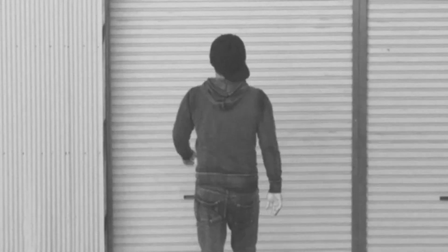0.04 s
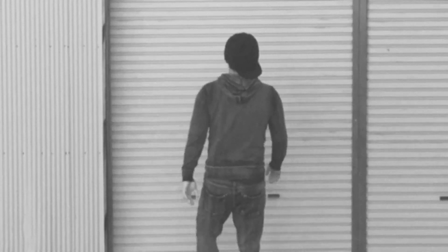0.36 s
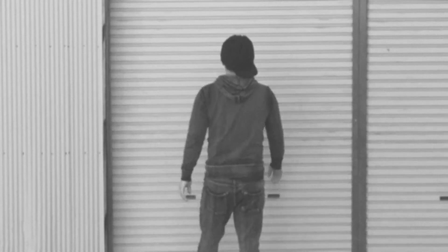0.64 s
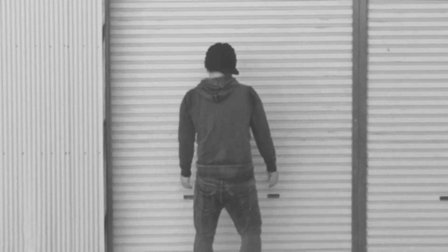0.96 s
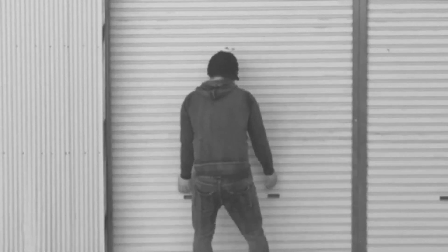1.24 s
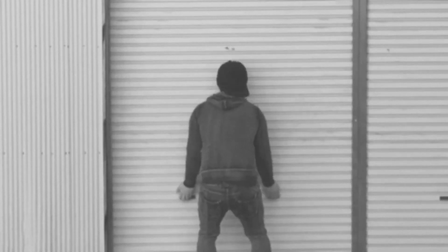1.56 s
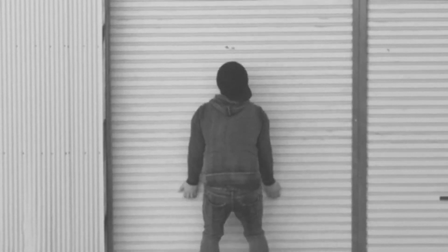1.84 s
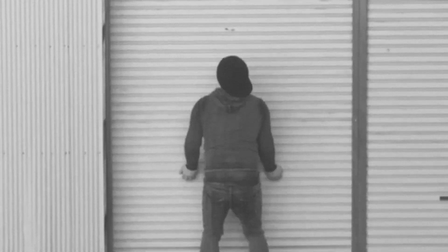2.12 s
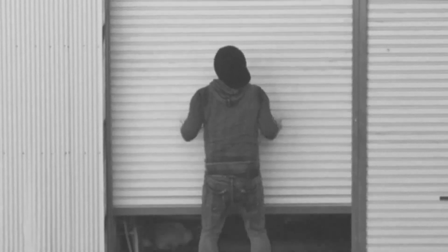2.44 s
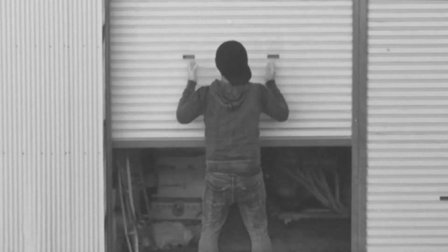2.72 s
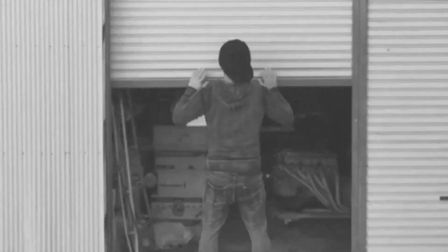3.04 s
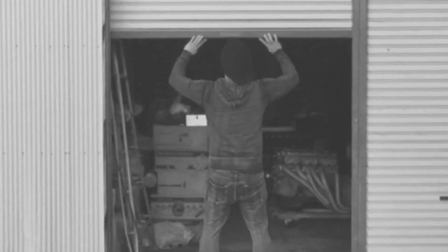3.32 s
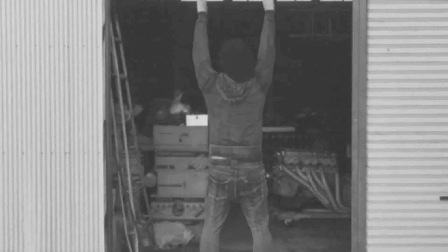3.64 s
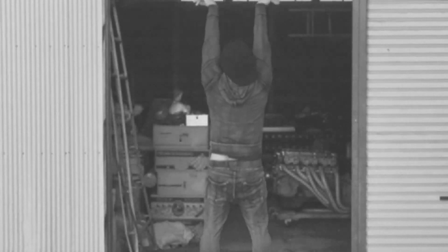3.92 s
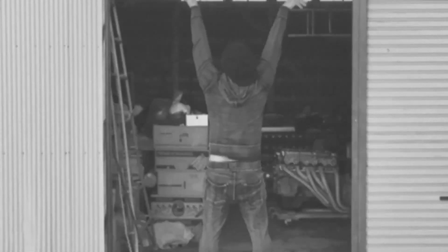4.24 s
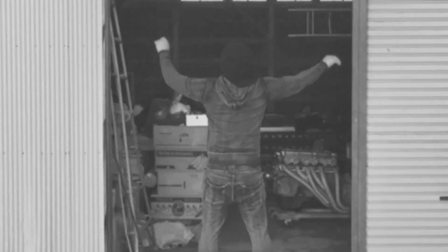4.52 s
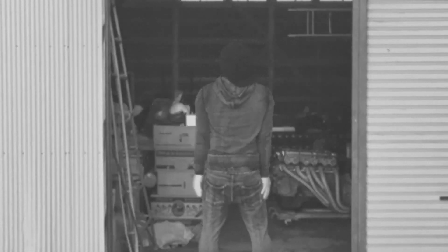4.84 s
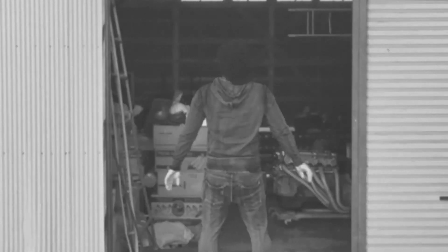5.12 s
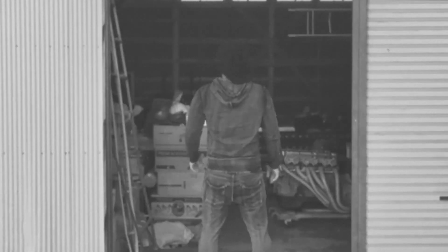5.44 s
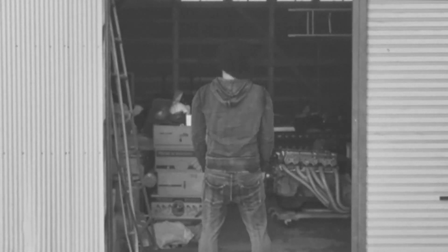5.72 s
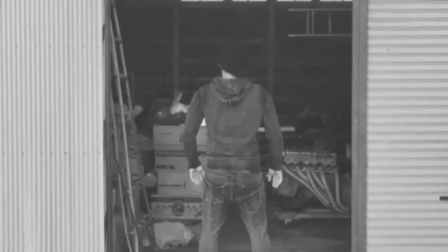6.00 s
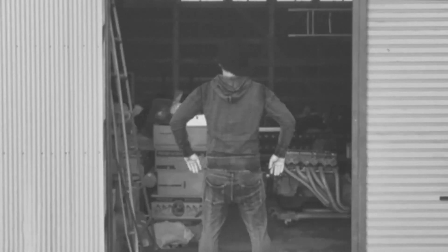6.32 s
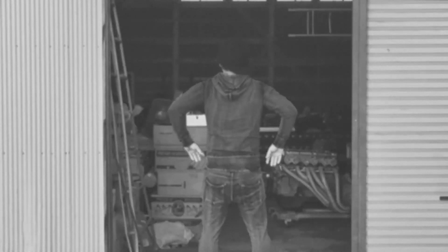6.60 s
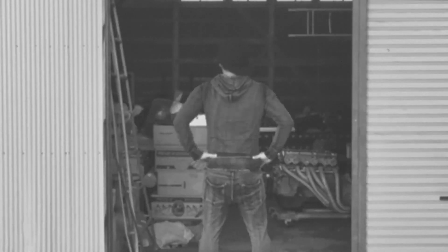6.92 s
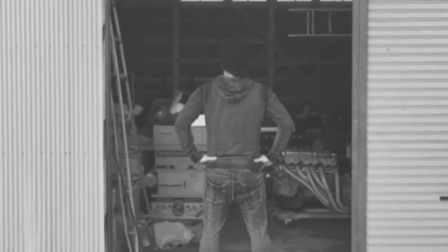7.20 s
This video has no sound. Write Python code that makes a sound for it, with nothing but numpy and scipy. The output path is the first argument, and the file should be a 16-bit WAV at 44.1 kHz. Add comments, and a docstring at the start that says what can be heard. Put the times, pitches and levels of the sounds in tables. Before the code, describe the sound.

For the first second or so, shoes scuff quietly on grit over a faint outdoor rumble. Around 1.5 seconds, metal handles click and a garage's corrugated steel roller shutter stirs slightly. From 2 seconds it is heaved up with a loud, dense rattle: the sheet drums low, the ribs clatter, and the edges scrape and knock in the rails, strongest between about 2.4 and 3.1 seconds. At 3.6 and 3.8 seconds it catches twice with a grinding stutter and short, high squeaks, then rolls on more slowly. At about 4.8 seconds it crashes into the top stop, rebounds and bangs again more lightly near 5.5 seconds. The blows leave a short, dull echo in the garage. The shudder dies away through the next second or so. From 6.2 seconds a distant bird gives five faint, hoarse calls, and a sleeve rustles softly at 7 seconds.

```python
"""Steel roller shutter, heaved open.

A man shuffles over grit, grips the handles and lifts. The corrugated curtain drums and clatters;
its edges scrape, knock and squeak in the guide rails. It binds twice near the top, crashes into
the stop and shudders to rest. The blows echo in the shed behind. A sleeve rustles and a far
bird calls over faint outdoor rumble."""
import sys
import numpy as np
from scipy import signal
from scipy.fft import rfft, irfft, next_fast_len
from scipy.io import wavfile

SR = 44100
rng = np.random.default_rng(int(sys.argv[2]) if len(sys.argv) > 2 else 0)


def store_wav(level_fs):
    """Save 16-bit WAV to argv[1]."""
    pcm = np.round(np.clip(np.atleast_2d(level_fs), -1, 1) * 32767)
    wavfile.write(sys.argv[1], SR, pcm.T.astype(np.int16))


N = 320166
TIME_S = np.arange(N) / SR

# Spectra: (frequency [Hz], relative density [dB])
DRUM_SPECTRUM = [(50, -23.5), (80, -7.5), (115, -1), (160, -3), (215, -3), (280, -7), (370, -13.5),
                 (700, -46)]  # sheet
CLATTER_SPECTRUM = [(100, -33), (220, -8), (330, -1), (500, -3), (780, -2.5), (1050, 0), (1400, -1.5),
                    (2000, -8.5), (2600, -3.5), (3300, -6), (4500, -13.5), (6200, -12.5), (9000, -36),
                    (16000, -42.5)]  # ribs
SCRAPE_SPECTRUM = [(500, -30.5), (1500, -12), (2700, -0.5), (4400, -6.5), (6000, -3), (8000, 2), (10000, 0),
                   (12000, -1), (14000, -2.5), (16000, -12.5)]  # edges
SWAY_SPECTRUM = [(18, -14.5), (35, -5), (50, 15), (64, -1.5), (82, 3), (101, 2.5), (125, -12.5),
                 (180, -36.5)]  # coil swaying on its axle
BIND_SPECTRA = [
    [(120, -28), (330, 5), (520, -8), (900, -1.5), (1900, -7), (3000, -1), (4700, -6), (7000, -2.5),
     (8000, -12), (9500, -1), (13500, 0), (16000, -6)],
    [(120, -17.5), (330, 0.5), (580, 4.5), (850, 0), (1400, 4), (2200, -4.5), (4500, -7), (7800, -3),
     (9500, 4.5), (11200, 0.5), (13000, -3), (16000, -5)],
]  # one per bind
KNOCK_SPECTRUM = [(300, -20), (2000, -13.5), (4300, -6), (5300, -3.5), (7000, 0.5), (9500, -4.5),
                  (12000, -3), (16000, -9)]
BOOM_SPECTRUM = [(25, -25.5), (110, 3.5), (230, 4), (330, -1.5), (460, 5), (600, -3.5), (850, -6.5),
                 (1100, -0.5), (2000, -14.5), (3200, -15), (6000, -33), (16000, -46)]
CRACK_SPECTRUM = [(200, -13.5), (1500, -10.5), (3100, 7), (4400, -6.5), (6000, 5.5), (7500, -7),
                  (11000, 0.5), (16000, 0.5)]
SCUFF_SPECTRUM = [(200, -0.5), (1800, 0), (5000, -4), (7000, -1), (10000, -3), (13000, 1), (15500, 4)]
AIR_SPECTRUM = [(12, -37), (20, -2.5), (123, -1), (142, -3), (262, -18), (293, -14.5), (410, -22.5),
                (873, -20.5), (1710, -29.5), (2020, -31.5), (4540, -39.5), (16000, -39.5)]
SHED_SPECTRUM = [(100, -22.5), (1500, -6), (5000, -4), (16000, -22)]
# Resonances: (frequency [Hz], width [Hz], relative level [dB])
SHEET_MODES = [(101.4, 21, -11.5), (197.35, 9.7, 7.5)]
RIB_MODES = [(364, 13, 0), (658.3, 59, 0), (1003, 91, -4), (1164, 18, -9), (1325, 57, -6.5), (1682, 50, -4)]
RAIL_MODES = [(2381, 74, -5.5), (2812, 300, -12), (5269, 130, -1), (9397, 460, 3), (13865, 200, -8)]
HANDLE_MODES = [(567, 205, -3.5), (1696, 61, 2), (2350, 80, -3), (3080, 250, -4), (5500, 120, -8.5),
                (6130, 200, -8.5)]
# Curtain noise laws: (level at full speed [dB], speed exponent, level after a full jerk [dB], t60 [s])
DRUM_LAW = (-20.5, 1.226, -26.5, 2.5)
CLATTER_LAW = (-18.5, 1.0729, -24.5, 2.0789)
JANGLE_LAW = (-24, 1.5, -27, 1.53)
SCRAPE_LAW = (-17, 1.91, -27, 1.1759)
# Lift, first heave to top stop: (time [s], speed [dB re full])
LIFT_SPEED = [(1.97, -21.5), (2.07, -13.5), (2.11, -7.5), (2.25, -9), (2.38, -3), (2.51, 1), (2.62, -2.5),
              (2.77, 0), (3.03, -4.5), (3.2, -4.5), (3.4, -6.5), (3.571, -10), (3.9, -7.5), (4.0, -12.5),
              (4.15, -9), (4.45, -11), (4.771, -7)]
# Curtain slides back: (time [s], length [s], speed [dB re full])
REBOUNDS = [(4.894, 0.217, -5.5), (5.597, 0.147, -16.5), (6.019, 0.128, -27.5)]
# Slack taken up, top stop met: (time [s], strength [dB], rise [s])
JERKS = [(1.55, -36, .02), (1.615, -31.5, 0.0068), (1.81, -31.5, 0.0061), (4.766, 2.5, 0.0144),
         (4.92, -4, 0.026), (5.454, -3.5, 0.0332), (5.82, -25, 0.011)]
# Bottom bar jams: (time [s], length [s], shudder [dB], its growth [dB], grind [dB], its growth [dB])
BINDS = [(3.593, 0.0892, -17, -2, -13, -7.5), (3.774, 0.058, -24, 7.5, -17.5, 3.5)]
# Edge hits rail: (time [s], strength [dB])
KNOCKS = [(1.618, -38), (1.813, -43), (1.9742, -20), (2.0231, -20.5), (2.1672, -10), (2.2636, -13),
          (2.2954, -5), (2.3783, -0.5), (2.8148, -3), (3.059, 1), (3.101, -3.5), (3.1859, -7),
          (3.2922, -8.5), (3.3358, -5), (3.447, -6), (3.5331, -13), (3.592, -5), (4.0917, -12),
          (4.1887, -11), (4.569, -12.5), (4.659, -11), (5.3395, -27.5)]
# Low booms swelling in the sheet's drumming, and crashes at the stops:
# (time [s], boom [dB], boom t60 [s], crack [dB])
BOOMS_AND_CRASHES = [(2.098, -27, 0.173, -18.5), (2.285, -18, 0.247, -40), (2.515, -12.5, 0.141, -30.5),
                     (2.745, -15.5, 0.127, -16.5), (2.955, -15.5, 0.127, -37),
                     (3.016, -11.5, 0.0545, -37.5), (3.817, -5.5, 0.072, -20.5), (4.697, -10, 0.0844, -37),
                     (4.766, -11.5, 0.33, -5.5), (5.472, -25.5, 0.68, -16), (5.826, -29.5, 0.187, -30.5)]
# Steel-on-steel stick-slip: (time [s], length [s], pitch [Hz], strength [dB])
SQUEAKS = [(1.542, 0.033, 1572, -50), (2.0597, 0.009, 9338, -11), (2.801, 0.0344, 9505, -17.5),
           (3.419, 0.019, 13640, -32.5), (3.606, 0.05, 8690, -21.5), (3.61, 0.086, 9210, -24),
           (3.629, 0.0665, 6850, -20.5), (3.635, 0.029, 3010, -18.5), (3.773, 0.0081, 9553, -8),
           (3.788, 0.044, 9500, -13), (3.796, 0.011, 6912, -17.5), (4.046, 0.0074, 9390, -25.5),
           (4.479, 0.0265, 3120, -34.5), (4.483, 0.009, 8620, -24.5), (4.66, 0.076, 9350, -37),
           (5.961, 0.0035, 9640, -36.5), (6.116, 0.00376, 9510, -44)]
# Hands take the loose handles: (time [s], level [dB])
GRIPS = [(1.4132, -40.5), (1.503, -49)]
# Shoes on grit: (time [s], relative crunch [dB], crunch t60 [s], snap [dB])
SCUFFS = [(0.198, -37.5, 0.37, -45.5), (0.265, -36, 0.152, -48.5), (0.285, -33.5, 0.24, -38.5),
          (0.362, -44.5, 0.062, -46), (0.457, -40, 0.25, -54), (0.867, -37.5, 0.059, -49.5),
          (0.889, -35.5, 0.13, -52.5), (0.939, -38, 0.38, -52), (1.105, -39.5, 0.093, -50.5),
          (1.169, -43.5, 0.21, -50.5)]
# Sleeve: (time [s], length [s], level [dB])
RUSTLE = (6.98, 0.284, -58.5)
# Far bird: (time [s], length [s], level [dB])
BIRD_CALLS = [(6.191, .15, -54), (6.562, 0.147, -53), (6.785, 0.1, -55), (6.951, .14, -56),
              (7.112, 0.154, -54.5)]
# Partials of a call: (frequency [Hz], relative level [dB])
BIRD_PARTIALS = [(1272, -3), (1790, -9.5), (2300, -13)]
# Far drone: (frequency [Hz], level [dB])
DRONE_TONES = [(86, -57), (118, -55.5)]


def curtain():
    """The moving sheet drums, the coil sways, the ribs clatter and the edges scrape."""
    flap_hz, flap_db, flap_peak_s = 4.666, 0.5, 2.54  # flapping swells the drumming
    swell_db = flap_db * np.cos(2 * np.pi * flap_hz * (TIME_S - flap_peak_s))
    lurch = wander(28)  # shared by ribs and edges
    return curtain_gain(DRUM_LAW, swell_db) * sheet_drum() + rib_clatter(lurch) + edge_scrape(lurch)


def sheet_drum():
    """Only the hanging sheet has clear modes; they fade as the swaying coil grows heavier."""
    rolled = np.clip((TIME_S - 2.2) / 2.125, 0, 1)
    thuds = impacts(per_s=250, spread_db=-1, t60_s=0.13)
    hanging = colour(thuds, DRUM_SPECTRUM, SHEET_MODES, modes_db=1.5)
    sheet = unit((1 - rolled) * hanging + rolled * colour(thuds, DRUM_SPECTRUM))
    coil = amp(-16 + 9.12 * rolled) * colour(rng.standard_normal(N), SWAY_SPECTRUM)
    return sheet + coil


def rib_clatter(lurch):
    """Ribs land on the drum; their high jangle dies sooner than their low clatter."""
    split_hz = 1820
    hits = impacts(per_s=800, spread_db=-0.5, t60_s=0.0808)
    ribs = unit(colour(hits, CLATTER_SPECTRUM, RIB_MODES) * amp(0.5 * lurch))
    jangle = signal.sosfilt(signal.butter(3, split_hz, "high", fs=SR, output="sos"), ribs)
    clatter = signal.sosfilt(signal.butter(3, split_hz, fs=SR, output="sos"), ribs)
    return curtain_gain(CLATTER_LAW) * unit(clatter) + curtain_gain(JANGLE_LAW) * unit(jangle)


def edge_scrape(lurch):
    """Sliding edges scrape and set the rails ringing."""
    ring_db = np.interp(TIME_S, [3.4, 4.7, 4.85], [-5, -7, -17])
    edges = colour(impacts(per_s=1600, spread_db=4.5, t60_s=0.0308), SCRAPE_SPECTRUM)
    scrape = edges + amp(ring_db) * rail_rings()
    return curtain_gain(SCRAPE_LAW) * unit(scrape * amp(1.9 * lurch))


def rail_rings():
    """Each rail mode flares and fades on its own as the contact point shifts."""
    out = np.zeros(N)
    for hz, width_hz, db in RAIL_MODES:
        phase = 2 * np.pi * hz * TIME_S
        ring = wander(width_hz) * np.cos(phase) + wander(width_hz) * np.sin(phase)
        out += amp(db) * unit(ring * amp(4 * wander(30)))
    return unit(out)


def curtain_gain(law, swell_db=0):
    """Envelope of one curtain noise: a power of the speed, plus each jerk's dying rattle."""
    full_db, exponent, jerk_db, t60_s = law
    energy = (amp(full_db + swell_db) * curtain_speed() ** exponent) ** 2
    for start_s, db, rise_s in JERKS:
        rattle = amp(jerk_db + db) * np.minimum(TIME_S / rise_s, 1) * fade(TIME_S, t60_s)
        add(energy, start_s, rattle ** 2)
    return np.sqrt(energy)


def curtain_speed():
    """Share of full speed: the lift, then ever smaller rebounds."""
    times_s, db = np.transpose(LIFT_SPEED)
    speed = amp(np.interp(TIME_S, times_s, db)) * (TIME_S > times_s[0]) * (TIME_S < times_s[-1])
    for start_s, length_s, rebound_db in REBOUNDS:
        progress = TIME_S[:int(length_s * SR)] / length_s
        add(speed, start_s, amp(rebound_db) * np.sin(np.pi * progress ** 0.646))
    return speed


def binds():
    """The bar jams in the rails: a fast stutter of slips shakes the sheet and grinds the edges."""
    out, t = np.zeros(N), TIME_S[:SR // 2]
    lowpass = signal.butter(4, 4500, fs=SR, output="sos")
    for bind, spectrum in zip(BINDS, BIND_SPECTRA):
        start_s, length_s, shudder_db, shudder_growth_db, grind_db, grind_growth_db = bind
        progress = np.minimum(t / length_s, 1)
        after_s = np.maximum(t - length_s, 0)
        ring = fade(after_s, t60_s=0.25)
        shudder = amp(shudder_db + shudder_growth_db * progress) * ring
        grind_decay = np.maximum(fade(after_s, t60_s=0.194), amp(-6.5) * ring)
        grind = amp(grind_db + grind_growth_db * progress) * grind_decay
        slips = colour(impacts(per_s=1500, spread_db=1.5, t60_s=0.015, size=len(t)), spectrum)
        low = signal.sosfiltfilt(lowpass, slips)
        add(out, start_s, attack(t, 0.0015) * (shudder * unit(low) + grind * unit(slips - low)))
    return out


def knocks():
    """An edge clashes with the rail, brighter when harder, and leaves it ringing."""
    out, t = np.zeros(N), TIME_S[:SR // 3]
    envelope = attack(t, 0.000956) * (fade(t, 0.0698) + amp(-15.5) * fade(t, 0.3))
    for start_s, strength_db in KNOCKS:
        tilt_db_per_octave = 0.13 * strength_db
        spectrum = [(hz, db + tilt_db_per_octave * np.log2(hz / 5000)) for hz, db in KNOCK_SPECTRUM]
        clash = colour(rng.standard_normal(len(t)), spectrum, RAIL_MODES, modes_db=2.5)
        add(out, start_s, amp(strength_db - 11.5) * envelope * clash)
    return out


def booms_and_crashes():
    """Swells in the drumming and crashes at the stops: each a bright crack and a slower low boom."""
    out, t = np.zeros(N), TIME_S[:SR]
    crack_envelope = attack(t, 0.0015) * (fade(t, 0.0685) + amp(-19) * fade(t, 0.53))
    for start_s, boom_db, boom_t60_s, crack_db in BOOMS_AND_CRASHES:
        crack = crack_envelope * colour(rng.standard_normal(len(t)), CRACK_SPECTRUM)
        boom_envelope = attack(t, 0.005) * fade(t, boom_t60_s)
        boom = boom_envelope * colour(rng.standard_normal(len(t)), BOOM_SPECTRUM)
        add(out, start_s, amp(crack_db) * crack + amp(boom_db) * boom)
    return out


def squeaks():
    """Friction drives one unsteady rail mode, which then rings out."""
    out, t = np.zeros(N), TIME_S[:SR // 4]
    for start_s, length_s, hz, db in SQUEAKS:
        jitter_hz = 9500 / np.sqrt(hz)  # low slips rasp, high ones whistle
        tone = wavering_tone(hz, jitter_hz, rate_hz=450, size=len(t))
        flutter = amp(2 * wander(400, len(t)))
        after_s = np.maximum(t - length_s, 0)
        envelope = attack(t, 0.001) * (0.69 * fade(after_s, 0.015) + 0.099 * fade(after_s, 0.22))
        add(out, start_s, amp(db) * envelope * unit(tone * flutter))
    return out


def grips():
    """A handle clacks against its seat and rings briefly."""
    out, t = np.zeros(N), TIME_S[:SR // 3]
    for start_s, db in GRIPS:
        clack = colour(rng.standard_normal(len(t)), KNOCK_SPECTRUM) * fade(t, 0.017)
        ring = colour(rng.standard_normal(len(t)), SCUFF_SPECTRUM, HANDLE_MODES, modes_db=12.5)
        add(out, start_s, amp(db) * (clack + amp(0.5) * ring * fade(t, 0.192)))
    return out


def scuffs():
    """A sole rolls onto grit: one grain snaps, then a dying crunch of tiny ones."""
    out, t = np.zeros(N), TIME_S[:SR // 2]
    for start_s, crunch_db, t60_s, snap_db in SCUFFS:
        grains = impacts(per_s=1500, spread_db=2, t60_s=0.0029, size=len(t))
        crunch = colour(grains, SCUFF_SPECTRUM) * fade(t, t60_s)
        snap = colour(rng.standard_normal(len(t)), SCUFF_SPECTRUM) * fade(t, 0.0072)
        add(out, start_s, amp(crunch_db - 12.5) * crunch + amp(snap_db) * snap)
    return out


def sleeve():
    """Cloth brushes cloth in one soft swell."""
    start_s, length_s, db = RUSTLE
    swell = np.sin(np.pi * np.clip((TIME_S - start_s) / length_s, 0, 1) ** 1.28)
    return amp(db) * swell * colour(impacts(per_s=2200, spread_db=-0.5, t60_s=0.005), SCUFF_SPECTRUM)


def bird():
    """Short, hoarse, far calls: unsteady partials swell quickly and fade."""
    out = np.zeros(N)
    for start_s, length_s, call_db in BIRD_CALLS:
        t = TIME_S[:int(length_s * SR)]
        swell = np.sin(np.pi * (t / length_s) ** 0.58)
        for hz, db in BIRD_PARTIALS:
            partial = wavering_tone(hz, jitter_hz=60, rate_hz=143, size=len(t))
            add(out, start_s, amp(call_db + db) * swell * partial)
    return out


def shed_echo(x):
    """Short dull echoes from the shed behind the shutter."""
    t = TIME_S[:SR]
    response = colour(rng.standard_normal(SR), SHED_SPECTRUM) * attack(t, 0.004) * fade(t, t60_s=0.79)
    return signal.oaconvolve(x, response / np.linalg.norm(response))[:N]


def air():
    """Outdoor rumble and hiss with a wavering far drone."""
    drone = sum(amp(db) * unit(wavering_tone(hz, jitter_hz=4, rate_hz=8)) for hz, db in DRONE_TONES)
    return amp(-50) * colour(rng.standard_normal(N), AIR_SPECTRUM) + drone


def impacts(per_s, spread_db, t60_s, size=N, contacts=4):
    """Random uneven hits at several contact points, each with its own brief ring; rms 1."""
    t = TIME_S[:int(t60_s * SR) + 8]
    out = np.zeros(size)
    for _ in range(contacts):
        force = amp(spread_db * np.minimum(rng.exponential(1, size), 3))
        hits = force * (rng.random(size) < per_s / contacts / SR) * rng.choice([-1, 1], size)
        ring = rng.standard_normal(len(t)) * fade(t, t60_s)
        out += signal.oaconvolve(hits, ring)[:size]
    return unit(out)


def colour(x, spectrum, modes=(), modes_db=0):
    """Filters x by a broad spectrum plus resonances; rms 1."""
    size = next_fast_len(len(x) + 2048)
    bins_hz = np.fft.rfftfreq(size, 1 / SR)
    hz, db = np.transpose(spectrum)
    power = amp(np.interp(np.log(bins_hz + 1), np.log(hz), db)) ** 2
    for centre_hz, width_hz, peak_db in modes:
        power += amp(peak_db + modes_db) ** 2 / (1 + ((bins_hz - centre_hz) / width_hz) ** 2) ** 2
    return unit(irfft(rfft(x, size) * np.sqrt(power), size)[:len(x)])


def wavering_tone(hz, jitter_hz, rate_hz, size=N):
    """Sine with randomly drifting pitch."""
    return np.sin(2 * np.pi * np.cumsum(hz + jitter_hz * wander(rate_hz, size)) / SR)


def wander(rate_hz, size=N):
    """Smooth noise, rolled off above rate_hz; rms 1."""
    bins_hz = np.fft.rfftfreq(size, 1 / SR)
    return unit(irfft(rfft(rng.standard_normal(size)) * np.exp(-(bins_hz / rate_hz) ** 2), size))


def attack(t, tau_s):
    """Exponential rise to 1."""
    return 1 - np.exp(-t / tau_s)


def fade(t, t60_s):
    """Decay by 60 dB in t60_s."""
    return np.exp(-np.log(1000) * t / t60_s)


def amp(db):
    """Decibels to gain."""
    return 10 ** (np.asarray(db) / 20)


def unit(x):
    """Scales to rms 1."""
    return x / np.sqrt(np.mean(x ** 2) + 1e-20)


def add(mix, start_s, sound):
    """Mixes a sound in at start_s."""
    part = mix[round(start_s * SR):][:len(sound)]
    part += sound[:len(part)]


def scene():
    """Shutter, man and outdoors in mono; only the shutter's short bursts echo."""
    bursts = binds() + knocks() + booms_and_crashes() + squeaks()
    outside = scuffs() + grips() + sleeve() + bird() + air()
    return (curtain() + bursts + amp(-14) * shed_echo(bursts) + outside)[None]


def record(dry):
    """Soft clip, then low-pass."""
    cutoff_hz = 15950
    rounded = dry / (1 + dry ** 6) ** (1 / 6)
    lowpass = signal.firwin(511, cutoff_hz, window=("kaiser", 9), fs=SR)
    return signal.oaconvolve(rounded, lowpass[None], "same")


dry = scene()
out = record(dry)
store_wav(out)
```